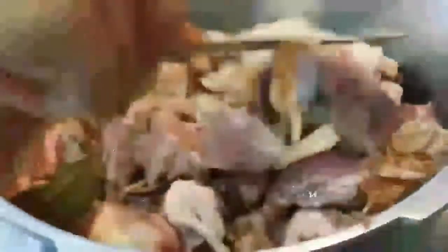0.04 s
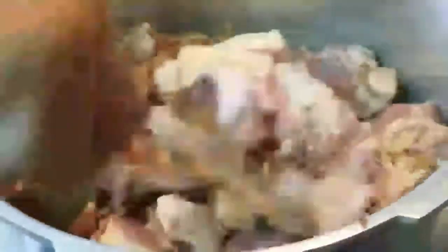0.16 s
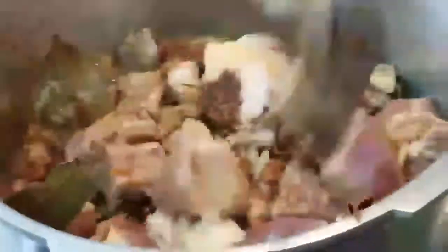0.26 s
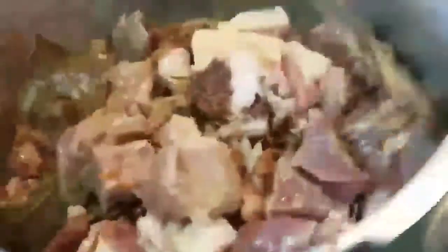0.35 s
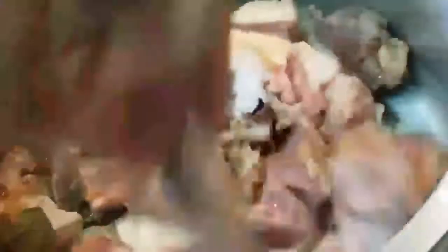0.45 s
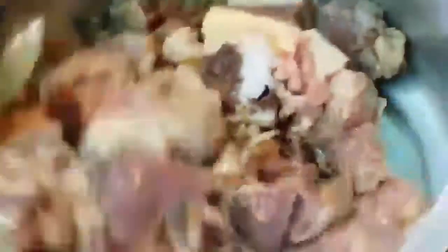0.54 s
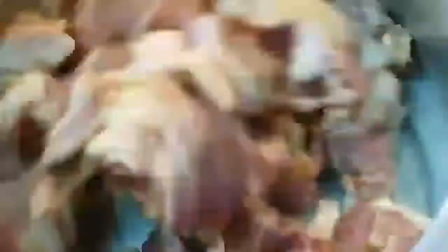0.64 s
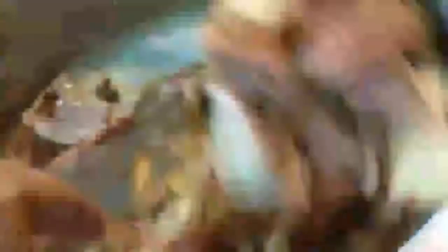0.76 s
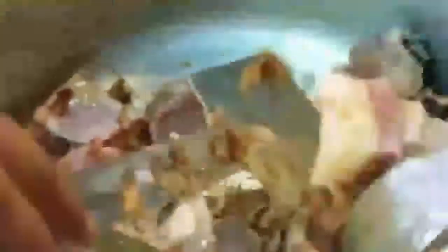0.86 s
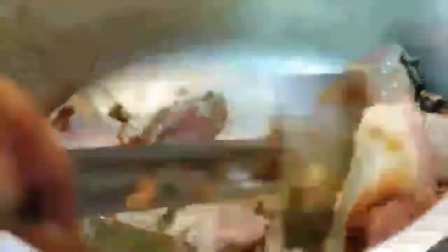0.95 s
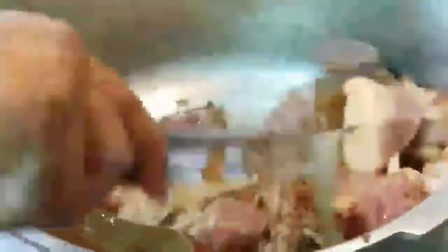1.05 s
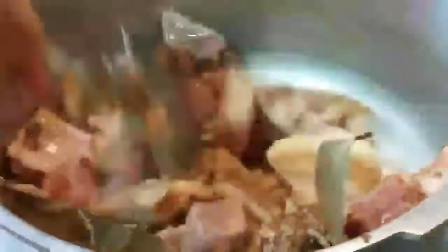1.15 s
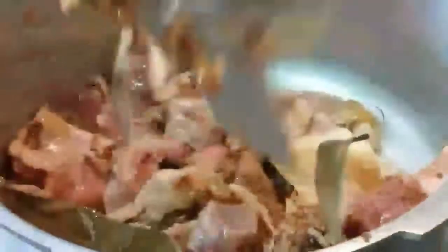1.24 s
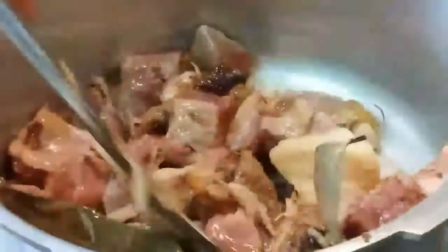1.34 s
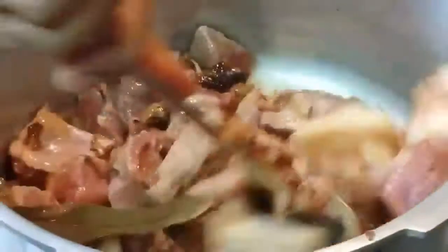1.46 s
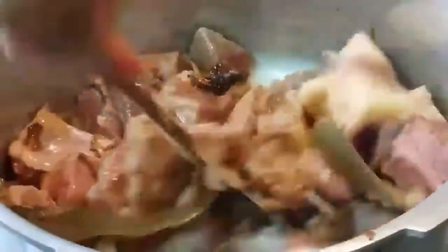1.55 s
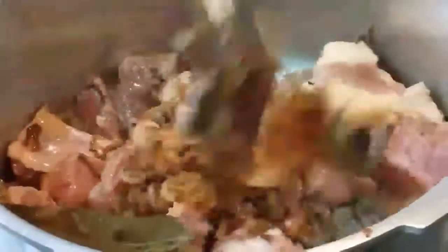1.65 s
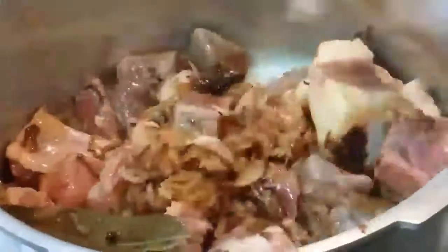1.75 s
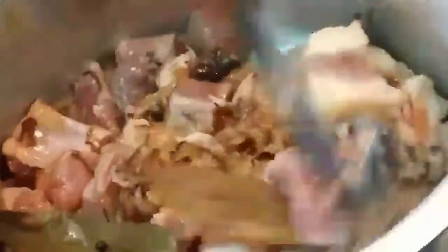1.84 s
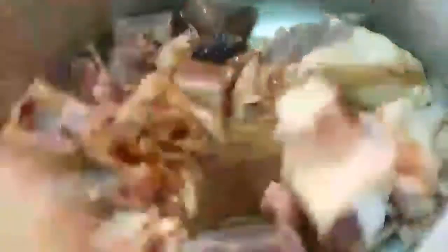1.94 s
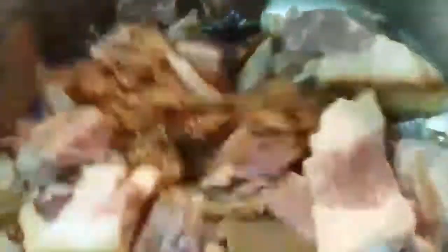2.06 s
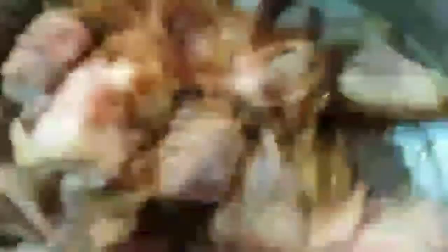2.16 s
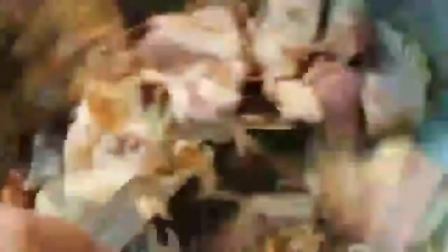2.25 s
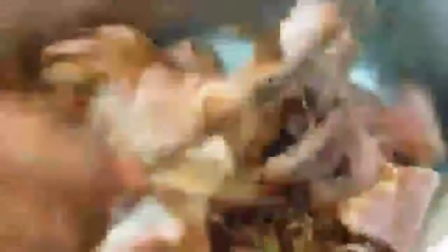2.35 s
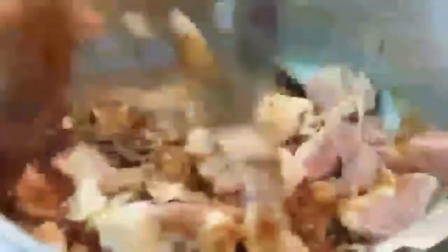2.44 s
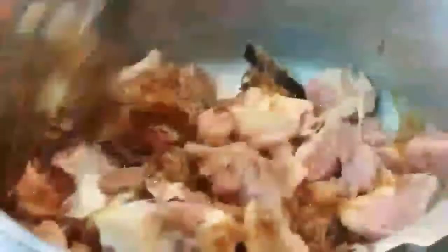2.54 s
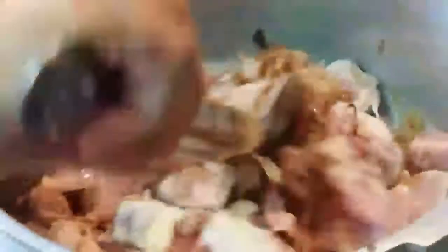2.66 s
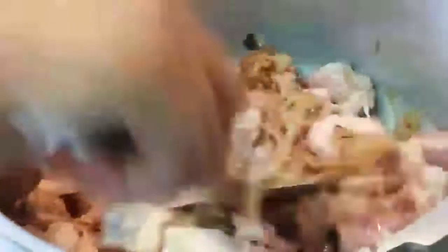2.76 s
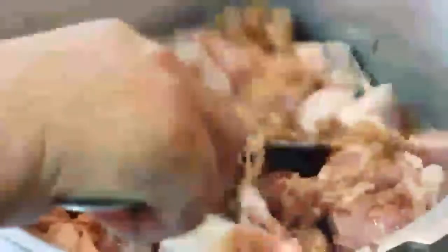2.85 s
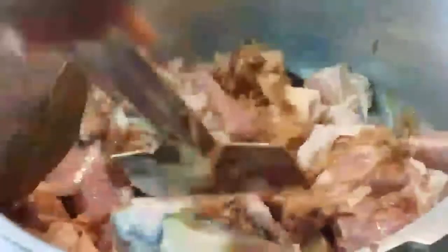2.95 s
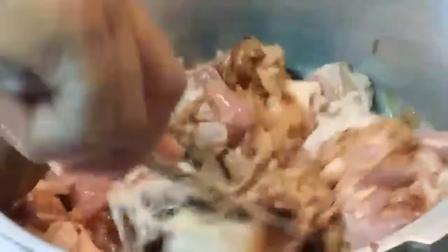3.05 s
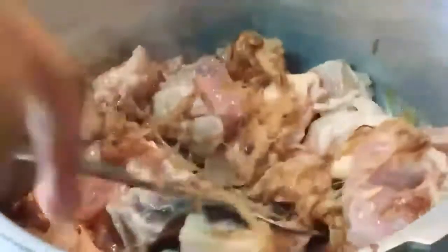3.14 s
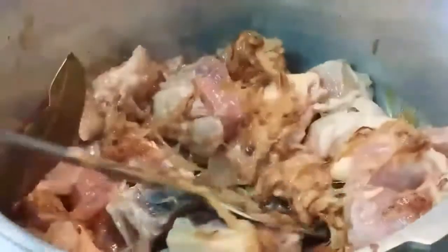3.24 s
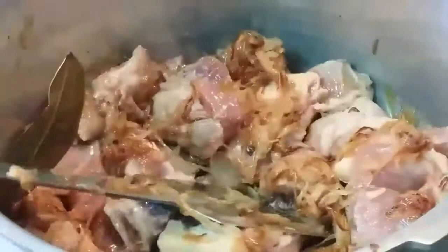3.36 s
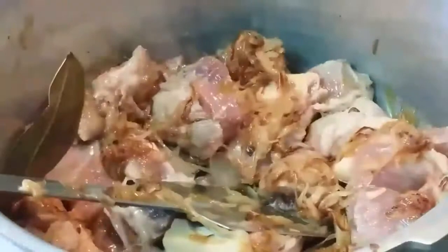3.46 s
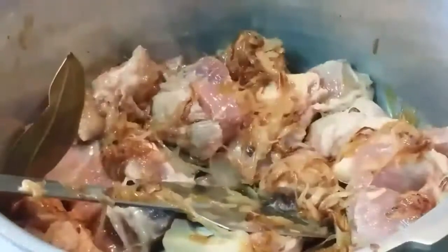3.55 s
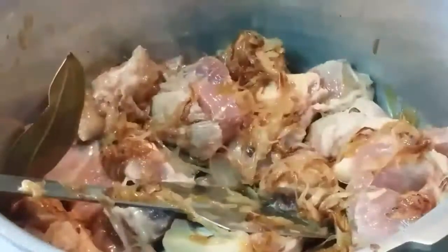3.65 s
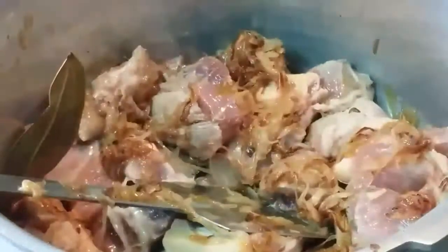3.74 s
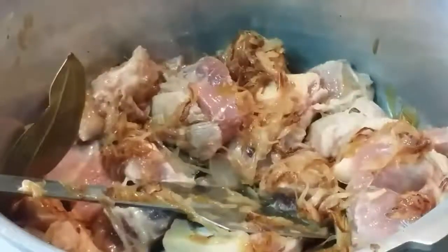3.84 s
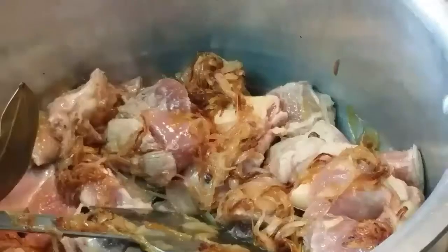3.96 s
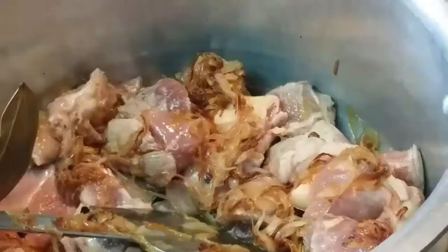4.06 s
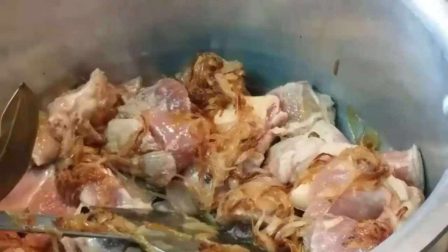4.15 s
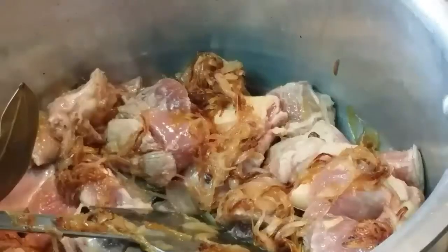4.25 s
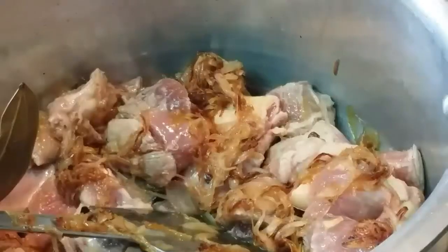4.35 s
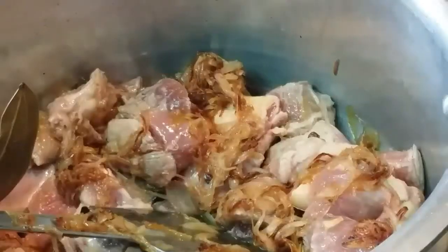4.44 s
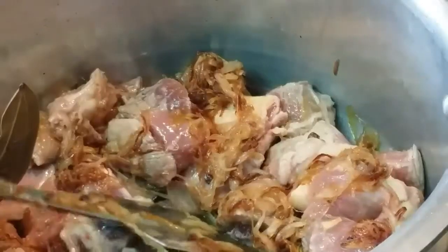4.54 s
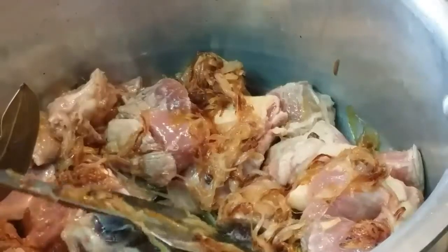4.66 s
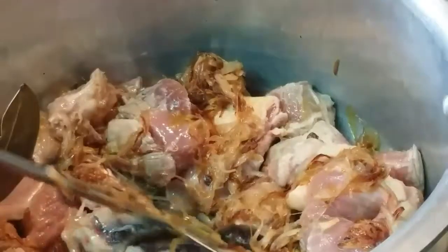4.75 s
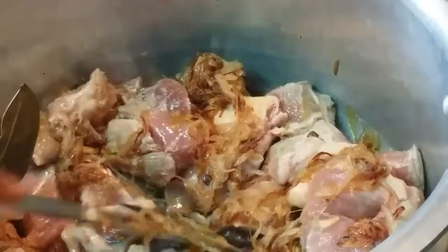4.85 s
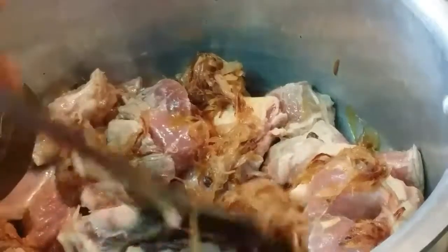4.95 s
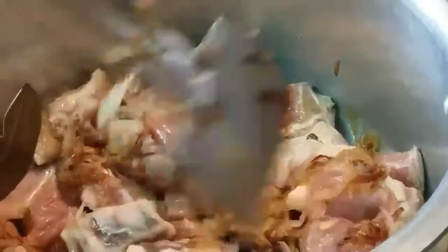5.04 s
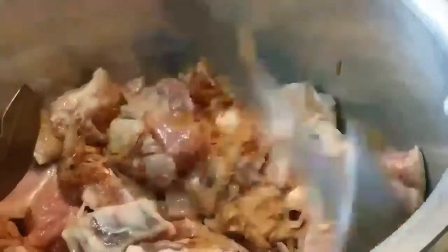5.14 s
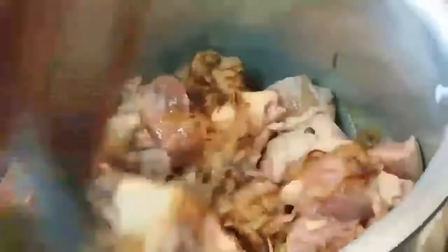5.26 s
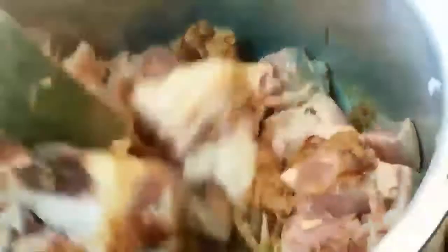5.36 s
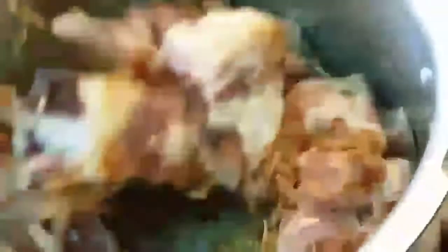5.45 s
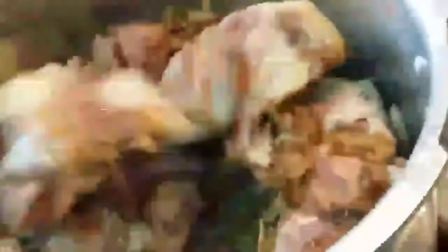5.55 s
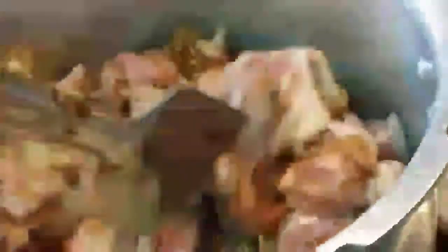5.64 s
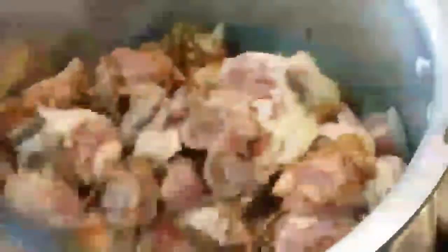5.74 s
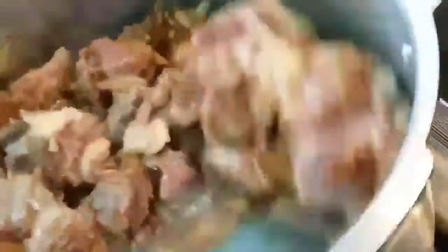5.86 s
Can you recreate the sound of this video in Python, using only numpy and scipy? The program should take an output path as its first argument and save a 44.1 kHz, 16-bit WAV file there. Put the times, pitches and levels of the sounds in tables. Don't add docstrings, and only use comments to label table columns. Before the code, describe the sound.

Close frying in an aluminium pot, sizzle easing down, with sharp spatula clangs, raspy metal scrapes, dull meat shoves and a quiet flame rumble.

```python
import sys
import numpy as np
from scipy import signal
from scipy.fft import rfft, irfft
from scipy.io import wavfile
from scipy.ndimage import uniform_filter1d, minimum_filter1d

SR = 44100
rng = np.random.default_rng(int(sys.argv[2]) if len(sys.argv) > 2 else 0)


def materialize(psi):
    bounded = np.clip(np.atleast_2d(psi).T, -1, 1)
    quanta = np.round(bounded * 32767).astype(np.int16)
    wavfile.write(sys.argv[1], SR, quanta)


def makeup_ratio(level_db):
    decades = np.asarray(level_db, float) / 20
    return 10 ** decades


N = 260190
T = np.arange(N) / SR

# f/Hz, density/dB
KITCHEN_SPECTRUM = [(15, -56), (25, -15), (75, -12), (124, -4), (397, -15.5), (580, -14.5), (784, -21.5),
                    (866, -21), (1710, -24), (3000, -29), (3900, -57), (6600, -120)]
# t/s, sizzle level/dB, wetness/dB (share of large low bubbles)
FRYING = [(0.0, -36.5, 2.5), (0.62, -35.5, -8.5), (0.72, -37, 2), (0.9, -39, 1), (1.28, -41.5, -1.5),
          (1.48, -40, -6.5), (1.68, -43, -2.5), (1.87, -46.5, -2), (2.05, -46.5, 6), (2.4, -56, -7),
          (2.75, -53, 4.5), (3.62, -58, 9.5), (3.72, -53.5, -4), (3.99, -56.5, 6), (4.8, -50, 4),
          (5.24, -52.5, 9), (5.4, -45.5, 9), (5.9, -56, 12)]
# f/Hz, density/dB
SIZZLE_SPECTRUM = [(150, -42), (250, -32), (398, -9), (573, -6.5), (809, -6), (945, 0), (1250, -4.5),
                   (1460, 2.5), (1700, -0.5), (3700, 0.5), (6770, -3), (8620, -0.5), (14500, -8),
                   (15500, -5.5)]
# f/Hz, width/Hz, level/dB
LOADED_MODES = [(270, 41, -1), (402, 360, 12), (520, 140, -2.5), (614, 105, -1), (732, 106, -4.5),
                (820, 64, -4.5), (934, 138, 0), (1150, 110, -2.5), (1300, 173, -0.5), (1517, 83, -6.5),
                (1730, 330, 2.5)]
# peak t/s, peak level/dB, press-in/s, let-go/s, centre f/Hz;
# both lengths span 20 dB
SHOVES = [(.54, -30, .012, 0.035, 990), (.568, -28.5, 0.047, 0.014, 770), (0.611, -26, 0.047, 0.028, 750),
          (.666, -38, 0.042, 0.065, 1340), (.8, -30.5, .01, 0.031, 726), (.95, -36, 0.0037, 0.046, 890),
          (1.052, -49, .15, 0.12, 1400), (1.22, -42.5, 0.18, 0.058, 1350), (1.938, -26, 0.011, 0.036, 880),
          (1.97, -25.5, 0.042, 0.02, 815), (1.995, -37, 0.022, .035, 696), (2.04, -49, .03, 0.024, 985),
          (2.174, -37, 0.11, 0.029, 970), (2.256, -39, 0.091, 0.025, 1290),
          (5.261, -43, 0.0057, 0.051, 690), (5.328, -29.5, 0.032, 0.026, 940),
          (5.368, -24.5, 0.045, 0.017, 716), (5.408, -33.5, 0.018, 0.032, 1400),
          (5.425, -38, 0.0089, 0.085, 790), (5.49, -39, 0.14, 0.068, 1130),
          (5.578, -38.5, 0.046, .012, 1500), (5.605, -38.5, .01, 0.047, 560), (5.72, -52, 0.16, 0.13, 1200)]
# f/Hz, level/dB, T60/s
BLADE_MODES = [(2677, 7, 0.076), (3190, 3.5, 0.092), (3930, 11, 0.037), (4458, 7, 0.099), (4910, 8, 0.039),
               (5810, 6, 0.048), (6740, 5, 0.012), (7730, -2, 0.024), (8690, 6.5, 0.33), (9500, -25, .06),
               (13100, -4, 0.044)]
# t/s, peak level/dB, colour centre f/Hz, T60/s
RASPS = [(0.46, -14, 8690, 0.13), (0.5867, -19, 3760, 0.11), (0.6044, -16.5, 7000, 0.16),
         (2.5855, -30.5, 3090, 0.09), (1.8848, -11.5, 5130, 0.22), (2.0423, -24.5, 3930, 0.047),
         (2.2812, -23.5, 4180, 0.082), (2.5358, -18, 8800, 0.031), (2.9245, -30.5, 5500, 0.26),
         (3.1494, -37, 9700, 0.2), (3.458, -18.5, 6000, 0.052), (4.6094, -35, 3720, 0.23),
         (5.249, -17, 5850, 0.16), (5.284, -20.5, 4550, 0.076), (5.339, -23.5, 3490, 0.45),
         (5.39, -19.5, 5740, 0.086), (5.5893, -22, 7210, 0.047), (5.8924, -14.5, 7950, 0.23)]
# t/s, peak level/dB, colour centre f/Hz
GRAZES = [(0.24, -19.5, 3260), (0.775, -15.5, 8500), (0.82, -20.5, 9430), (1.56, -20, 3000),
          (1.958, -24.5, 5450), (1.192, -19.5, 3510), (1.215, -21, 4500), (2.708, -30, 5810),
          (3.2, -40, 3000), (3.465, -30, 4500), (3.48, -37, 4500), (4.29, -35, 3640), (5.005, -32, 7350),
          (5.315, -27, 6150), (5.36, -25, 7290), (5.415, -30, 3090), (5.445, -23.5, 3600),
          (5.475, -32, 4500), (5.705, -32, 4100), (5.846, -40, 8500)]
# f/Hz, level/dB, T60/s
POT_MODES = [(264, -1, 0.23), (400, -34, 0.063), (549, -6, 0.23), (600, -0.5, 0.12), (854, -3, 0.21),
             (926, -6.5, 0.27), (1130, 5, 0.052), (1410, 11, 0.072), (1599, -7, 0.059), (2300, -25, .05),
             (2280, -19, 0.027), (2700, -6, 0.05)]
# t/s, peak level/dB, contact f/Hz, wall f/Hz, relative wall level/dB
CLANGS = [(0.051, -15, 957, 966, -12), (.054, -25.5, 400, 288, -7.5), (.7928, -22, 552, 1300, -4),
          (.801, -23.5, 760, 560, -14), (0.94, -24, 864, 400, -29), (2.035, -35, 1550, 570, -4),
          (2.2836, -11.5, 1290, 926, -16.5), (2.286, -19, 520, 1599, -2), (2.29, -27.5, 1670, 549, 5.5),
          (2.535, -17.5, 1410, 1599, -15), (2.536, -26.5, 3000, 1130, -2), (2.59, -45.5, 520, 600, 0),
          (2.585, -28.5, 1410, 2700, -0.5), (2.927, -35, 1274, 894, -4.5), (2.948, -42.5, 2020, 1950, 6),
          (3.46, -30, 1405, 790, -1), (3.472, -44.5, 264, 264, 10), (4.611, -45.5, 1130, 814, 1),
          (5.182, -40.5, 702, 270, -3), (5.589, -22.5, 1130, 555, -8), (5.893, -24.5, 1040, 870, 2.5)]
# t/s, peak level/dB, f/Hz
TAPS = [(0.05, -19.5, 1850), (0.793, -29, 1720), (0.939, -39, 1670), (2.592, -31, 1560), (5.59, -36, 2300),
        (0.102, -26.5, 956), (0.22, -32, 1130), (0.696, -32, 1065), (1.724, -43, 2300), (2.051, -47, 270),
        (2.273, -43, 1030), (2.722, -45, 1050), (3.002, -46, 1467), (3.181, -47, 1560), (4.09, -50, 717),
        (5.269, -32, 697), (5.533, -40, 1330), (5.565, -44, 1260)]


def noise():
    return rng.standard_normal(N)


def unit(x):
    return x / np.sqrt(np.mean(x ** 2))


def band(x, hz, width_hz):
    hz = min(hz, 0.45 * SR)
    return signal.lfilter(*signal.iirpeak(hz, hz / width_hz, fs=SR), x)


def butter(x, order, hz, kind):
    return signal.sosfilt(signal.butter(order, hz, kind, fs=SR, output="sos"), x)


def colour(x, spectrum):
    hz, db = np.transpose(spectrum)
    f = np.maximum(np.arange(N // 2 + 1) * SR / N, 1)
    gain_db = np.interp(np.log(f), np.log(hz), db, -90, -90)
    return irfft(rfft(x) * makeup_ratio(gain_db), N)


def walk(rate):
    hold = int(SR / rate)
    steps = np.repeat(rng.standard_normal(N // 100), hold)[:N]
    return unit(uniform_filter1d(uniform_filter1d(steps, hold), hold))


def clicks(rate, spread_db):
    out = np.zeros(N)
    where = rng.integers(0, N, int(rate * N / SR))
    size_db = spread_db * np.minimum(rng.exponential(size=len(where)), 4)
    out[where] = makeup_ratio(size_db) * rng.choice([-1, 1], len(where))
    return unit(out)


def ring(modes, centre_hz, octaves, t, phase, damp):
    hz, db, t60 = np.array(modes).T[:, :, None]
    near = np.exp(-0.5 * (np.log2(hz / centre_hz) / octaves) ** 2)
    decay = makeup_ratio(db - 60 * t / (t60 * damp))
    y = np.sum(near * decay * np.sin(2 * np.pi * hz * t + phase[:len(hz), None]), axis=0)
    return y / np.max(np.abs(y))


def add(out, s, x):
    i = int(s * SR)
    out[i:i + len(x)] += x[:N - i]


def burner():
    muffle_db = -4.5 * np.interp(T, [1.86, 2.0, 2.35, 2.5], [0, 1, 1, 0])
    flutter = makeup_ratio(0.82 * walk(12) + 0.34 * walk(3.35))
    return unit(colour(noise() * flutter, KITCHEN_SPECTRUM)) * makeup_ratio(-54.5 + muffle_db)


def sizzle():
    s, db, wet_db = np.transpose(FRYING)
    out, surge = 0, walk(40)
    for k, hz in enumerate(250 * 2.0 ** np.arange(6)):
        edges = [hz, 2 * hz if k < 5 else 20000]
        pops = butter(noise() + 0.71 * clicks(rate=2500, spread_db=3.5), 2, edges, "bandpass")
        deep_db = np.interp(T, s, wet_db) * max(1 - k / 3, 0)
        out = out + pops * makeup_ratio(deep_db + 0.8 * surge + 0.9 * walk(50))
    out = colour(out, SIZZLE_SPECTRUM)
    treble = butter(out, 4, [3000, 12000], "bandpass")
    return out / np.std(treble) * makeup_ratio(np.interp(T, s, db))


def shoves():
    roundness = 1.22
    glide_oct_per_s = 0.28
    jolts = (clicks(rate=2500, spread_db=2.5) + 0.8 * noise()) * makeup_ratio(1.5 * walk(90))
    voices = np.array([unit(band(band(jolts, hz, width), hz, 3 * width)) for hz, width, _ in LOADED_MODES])
    mode_hz, _, mode_db = np.array(LOADED_MODES).T[:, :, None]
    out = np.zeros(N)
    for s, db, press_s, release_s, centre_hz in SHOVES:
        span = slice(int((s - 2 * press_s) * SR) - 200, int((s + 2 * release_s) * SR) + 200)
        t = T[span] - s
        distance = np.where(t < 0, -t / press_s, t / release_s)
        gain = uniform_filter1d(makeup_ratio(db - 20 * distance ** roundness), 200)
        octave = np.log2(centre_hz) + glide_oct_per_s * t
        near = makeup_ratio(mode_db) * np.exp(-0.5 * ((np.log2(mode_hz) - octave) / 0.41) ** 2)
        rub = np.sum(near * voices[:, span], axis=0) / np.sqrt(np.sum(near ** 2, axis=0))
        out[span] += gain * rub
    return out


def rasps():
    graze_t60_s, graze_rise_s = 0.12, 0.0047
    skid = (noise() + 0.55 * clicks(rate=3000, spread_db=4.0)) * makeup_ratio(1.8 * walk(120))
    voices = [makeup_ratio(db) * unit(band(skid, hz, 15.6 / t60)) for hz, db, t60 in BLADE_MODES]
    hiss = unit(band(band(skid, 6800, 6900), 8800, 8900))
    out, t = np.zeros(N), T[:SR // 3]
    strokes = [(s, db, hz, t60, 0.00083 + 0.0073 * t60) for s, db, hz, t60 in RASPS]
    strokes += [(s, db, hz, graze_t60_s, graze_rise_s) for s, db, hz in GRAZES]
    detune = rng.standard_normal((len(strokes), len(BLADE_MODES)))
    mode_hz = np.array(BLADE_MODES)[:, 0]
    for (s, db, hz, t60, rise_s), d in zip(strokes, detune):
        near = np.exp(-0.5 * (np.log2(mode_hz / hz) / 1.1) ** 2) * makeup_ratio(2.5 * d)
        part = slice(int(s * SR), int(s * SR) + len(t))
        steel = unit(sum(g * v[part] for g, v in zip(near, voices))) + 0.56 * hiss[part]
        bite = 2.26 * makeup_ratio(-60 * t / 0.013)
        shape = makeup_ratio(db - 14) * (makeup_ratio(-60 * t / t60) + bite) * (1 - np.exp(-t / rise_s))
        add(out, s, steel * shape[:len(steel)])
    return out


def knocks():
    tap_wall_db = -9.5
    out, t = np.zeros(N), T[:SR // 4]
    blows = CLANGS + [(s, db, hz, hz, tap_wall_db) for s, db, hz in TAPS]
    chance = rng.random((len(blows), len(POT_MODES)))
    grit = noise()
    for (s, db, hz, wall_hz, wall_db), c in zip(blows, chance):
        t60 = 0.038 * (1000 / hz) ** 0.54 * makeup_ratio(-0.38 * (db + 30))
        piece = grit[int(s * SR) // 2:][:len(t)]
        crunch = unit(band(band(piece, 1.18 * hz, 0.98 * hz), 0.92 * hz, 0.54 * hz))
        onset = 1 - np.exp(-t / 0.00015)
        thud = makeup_ratio(-60 * t / t60) * (np.sin(2 * np.pi * hz * t) + 0.6 * crunch) * onset
        swell = (1 - np.exp(-t * wall_hz / 2.5)) * np.exp(-(t / 0.055) ** 2)
        main = ring(POT_MODES, wall_hz, 0.083, t, 2 * np.pi * c, damp=0.7)
        rest = ring(POT_MODES, hz, 1.0, t, 2 * np.pi * c[::-1], damp=1.0)
        add(out, s, makeup_ratio(db) * (thud + makeup_ratio(wall_db) * swell * (main + 0.24 * rest)))
    return butter(out, 2, 170, "highpass")


def room(x):
    t60_s = 0.19
    t = T[:SR // 2]
    tail = rng.standard_normal(len(t)) * makeup_ratio(-60 * t / t60_s) * (t > 0.003)
    return signal.fftconvolve(x, tail / np.sqrt(np.sum(tail ** 2)))[:N]


def scene():
    spatula = shoves() + rasps() + knocks()
    return (burner() + sizzle() + spatula + makeup_ratio(-11.5) * room(spatula))[None]


def low_pass(x):
    return signal.sosfilt(signal.butter(12, 16230, fs=SR, output="sos"), x)


def record(dry):
    loud_db = 10 * np.log10(uniform_filter1d(dry[0] ** 2, 130) + 1e-12)
    over_db = np.maximum(loud_db + 24.0, 0)
    duck_db = uniform_filter1d(minimum_filter1d(-0.25 * over_db, 500), 200)
    return low_pass(dry * makeup_ratio(duck_db))


dry = scene()
out = record(dry)
materialize(out)
```